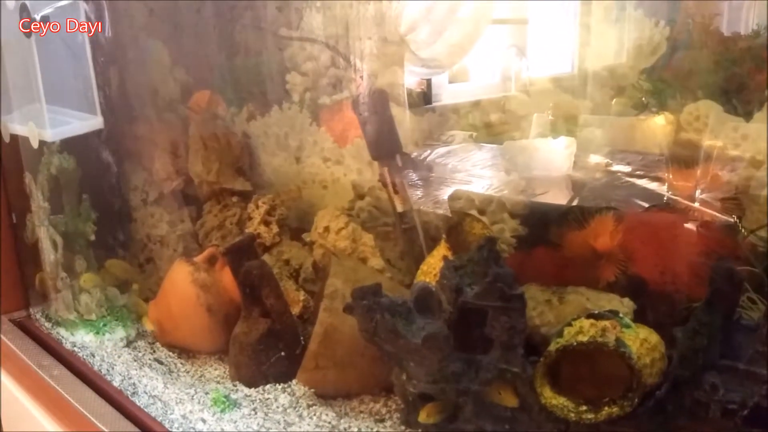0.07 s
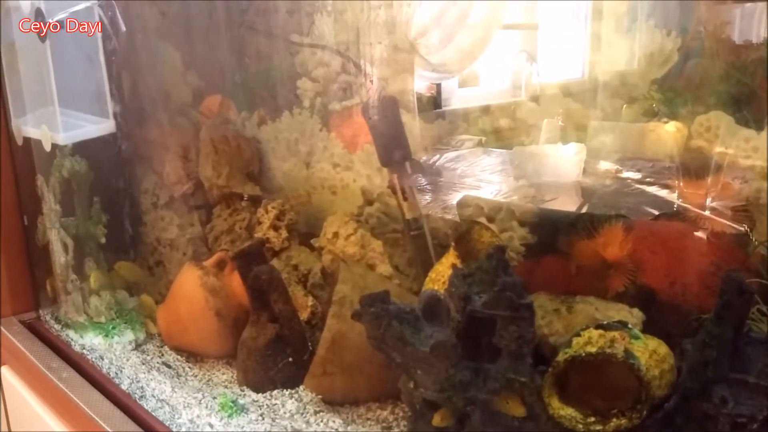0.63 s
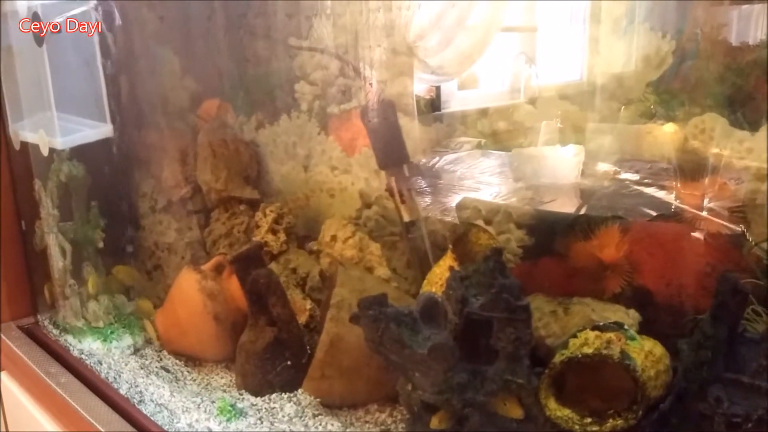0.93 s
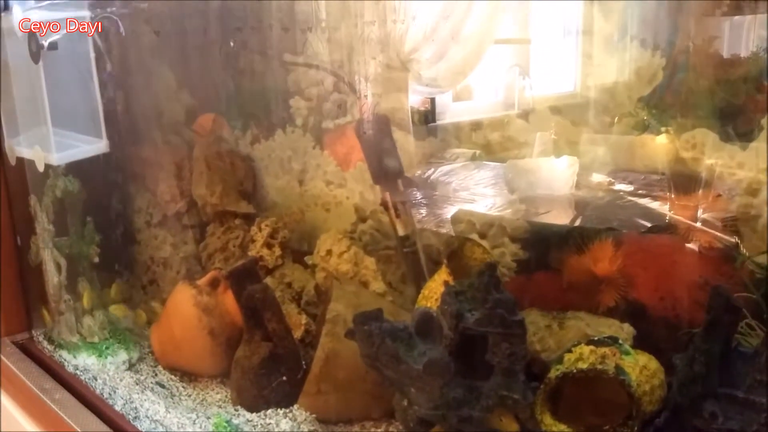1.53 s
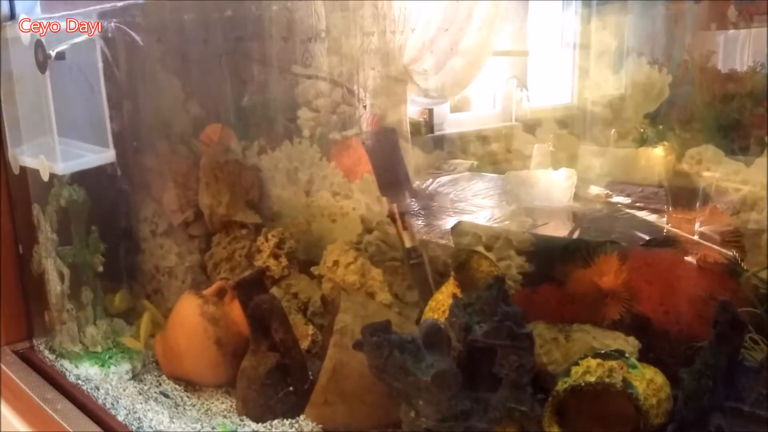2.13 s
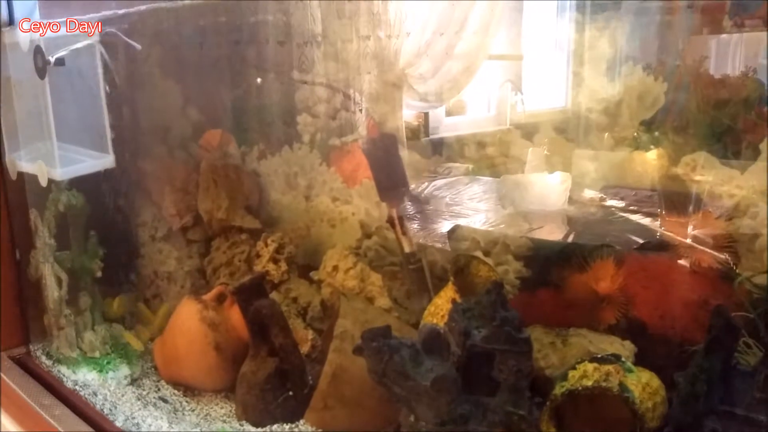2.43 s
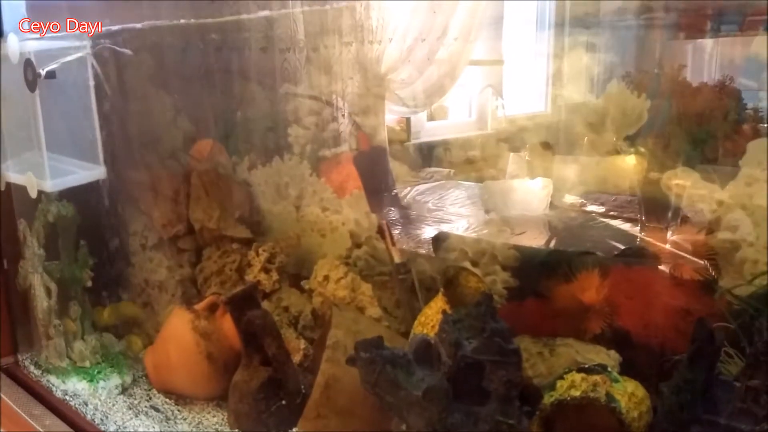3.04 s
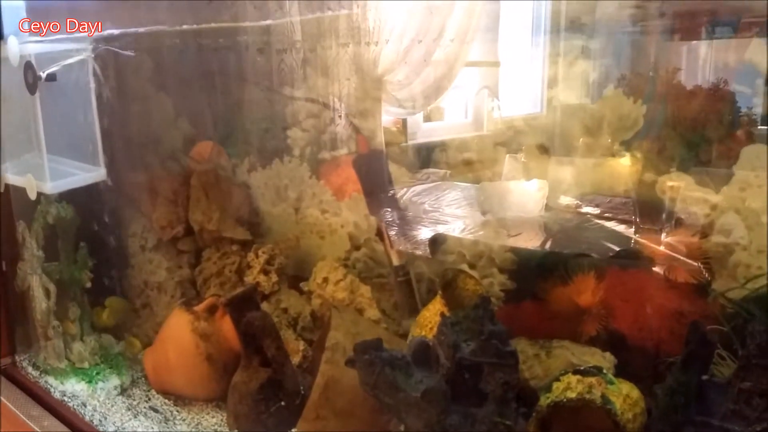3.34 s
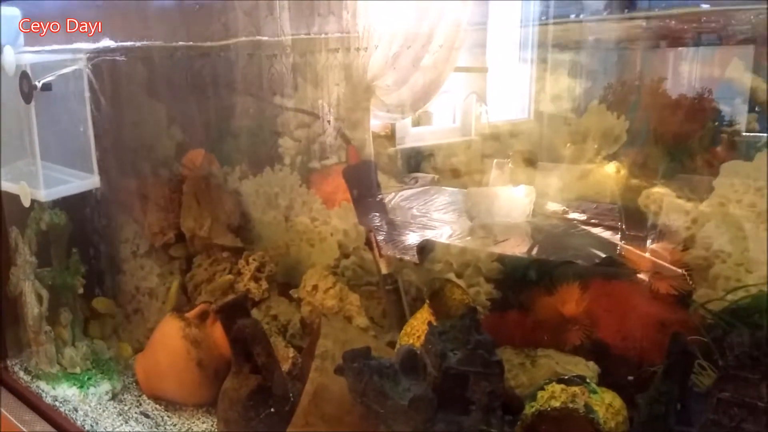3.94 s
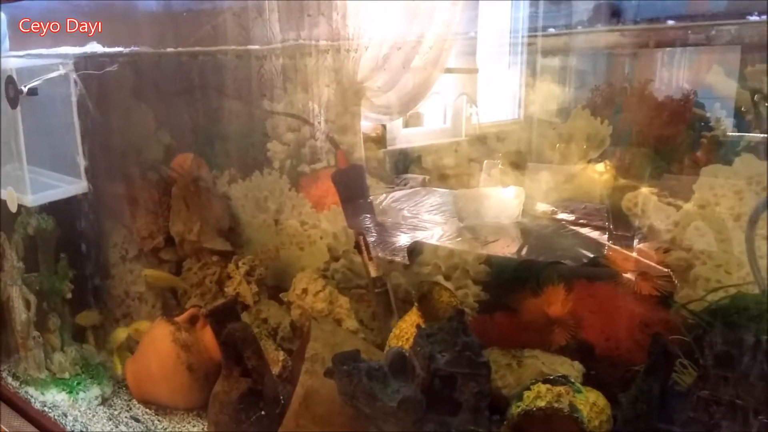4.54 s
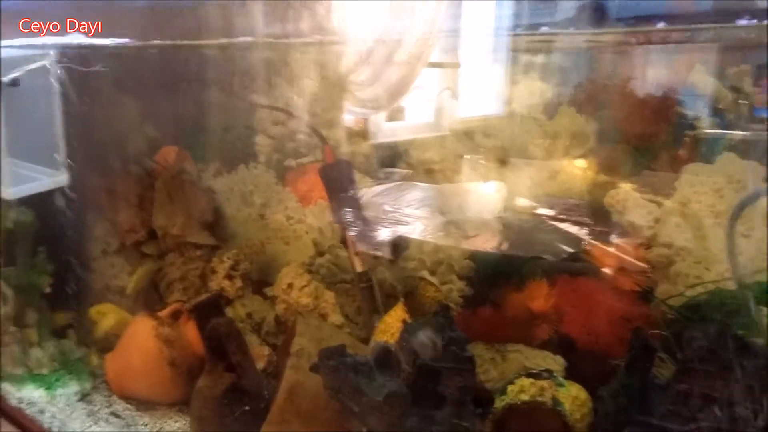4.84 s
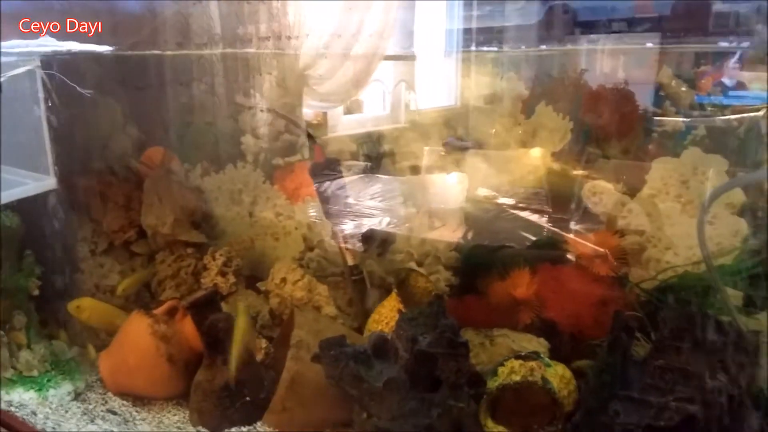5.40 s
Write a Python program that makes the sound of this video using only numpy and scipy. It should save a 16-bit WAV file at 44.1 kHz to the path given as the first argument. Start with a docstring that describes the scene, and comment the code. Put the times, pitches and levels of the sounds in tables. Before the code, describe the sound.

A quiet home aquarium is heard from just in front of the glass for about five and a half seconds. From start to finish a pump gives a steady low electric hum, throbbing gently as a second motor beats against it, with a soft rumble of churning water underneath. Over this the filter outflow trickles continuously onto the surface, with a fine, sputtering fizz toward the right. Small bubbles plink at irregular moments, many each second, high and varied in pitch, with a very short echo under the lid. At about 1.9 seconds a large air pocket gives a soft low gulp with a brief slosh. Two bubbles burst with faint, crisp ticks at about 3.4 and 4.3 seconds. A deeper gulp comes at about 4.9 seconds. The hum and trickle carry on at the same level to the end.

```python
"""A home aquarium, heard from just in front of the glass. Churning water rumbles, a mains-driven pump hums
at 50 Hz, and a second motor slips a little behind it, so the two beat and the hum throbs. Now and then a
large air pocket gives a soft low gulp, and two bubbles burst with a tick. The filter outflow trickles
onto the surface and entrains air: fine spray fizzes on the right, and bubbles ring as damped
oscillators, reverberating under the hood."""
import sys
import numpy as np
from scipy import signal
from scipy.fft import rfft, irfft
from scipy.io import wavfile
from scipy.ndimage import uniform_filter1d

SR = 44100
rng = np.random.default_rng(int(sys.argv[2]) if len(sys.argv) > 2 else 0)


def unload_audio(sound):
    """Save the sound as a 16-bit wav file, at the path given as the first command line argument."""
    columns = np.transpose(np.atleast_2d(sound))
    # keep every value between -1 and 1, then stretch to whole-number steps
    steps = np.round(np.clip(columns, -1, 1) * 32767)
    wavfile.write(sys.argv[1], SR, steps.astype(np.int16))


N = 245637
TIME = np.arange(N) / SR


def undb(db):
    """Decibels to amplitude ratio."""
    return 10 ** (np.asarray(db) / 20)


def unit(x):
    """Normalisation to rms 1."""
    return x / np.sqrt(np.mean(x ** 2))


def colour(x, points):
    """Spectral shaping by a curve through (frequency_hz, gain_db) points."""
    hz, db = np.transpose(points)
    bins = np.maximum(np.fft.rfftfreq(N, 1 / SR), 1)
    return irfft(rfft(x) * undb(np.interp(np.log(bins), np.log(hz), db)), N)


def walk(rate_hz):
    """Random modulation: smoothed Gaussian steps with rms 1."""
    hold = int(SR / rate_hz)
    steps = np.repeat(rng.standard_normal(N // hold + 1), hold)
    return unit(uniform_filter1d(uniform_filter1d(steps, hold), hold)[:N])


def add(out, start_s, sound):
    """Superposition of a sound at a given time."""
    i = int(np.clip(start_s * SR, 0, N - 1))
    out[i:i + len(sound)] += sound[:N - i]


# Spectrum of the churning water: frequency_hz, gain_db
CHURN_SPECTRUM = [(25, -11), (55, -10), (85, -4), (110, 3.5), (140, -3), (200, 8), (330, 2.5), (465, 5.5),
                  (520, 3), (620, 0.7), (900, -5), (1100, -1.4), (1170, -7), (1260, -1), (1400, -10.5),
                  (1550, -5.5), (1650, -6), (14000, -29)]
def churn():
    """Flow noise: water driven through the filter rumbles, its bass coherent between the two sides."""
    mid = rng.standard_normal(N)
    side = colour(rng.standard_normal(N), [(60, -3), (150, -22), (400, -.5), (800, -4.5), (1300, 1)])
    water = colour(np.array([mid + side, mid - side]), CHURN_SPECTRUM)
    return unit(water) * undb(-58 + .79 * walk(9.1))


# Resonances of the glass panes: centre_hz, width_hz
PANE_MODES = [(99, 8), (302, 8), (357, 41), (452, 8), (715, 70)]
def hum(turn_hz, delay_s, harmonics, spread_rad, waver_db):
    """Forced vibration: one stroke per turn gives a harmonic series, shifted in phase by the panes."""
    out = np.zeros((2, N))
    drift = (TIME / TIME[-1]) ** 2  # the listener moves ever faster through the room's standing waves
    for harmonic, *db in harmonics:
        hz = harmonic * turn_hz
        pane_lag = sum(2 * np.arctan2(hz * width, centre ** 2 - hz ** 2) for centre, width in PANE_MODES)
        # the shorter the wave, the more the two sides differ; the shortest lose step with the stroke
        side_lag = spread_rad * min(hz / 1000, 1) * rng.choice([-1, 1]) * np.array([[1], [-1]])
        lag = pane_lag + side_lag + (hz > 720) * rng.uniform(0, 2 * np.pi)
        level_db = db[0] + (db[-1] - db[0]) * drift + waver_db * min(hz / 600, 1) * walk(6.3)
        out += np.sqrt(2) * undb(level_db) * np.cos(2 * np.pi * hz * (TIME - delay_s) - lag)
    return out


# Partials of the pump at the drifting listener: harmonic_number, first_level_db, last_level_db
PUMP_HARMONICS = [(1, -84.7, -85.9), (2, -61.7, -62.3), (3, -57.5, -57.8), (4, -52.2, -53.7),
                  (5, -61.2, -62.8), (6, -65.2, -64.6), (7, -60.0, -61.3), (8, -69.3, -69.2),
                  (9, -68.5, -76), (10, -70.5, -62.5), (11, -66.5, -65.4), (12, -66, -67),
                  (13, -72.2, -74.1), (14, -73.1, -73.0), (15, -85.7, -84.3), (16, -88.6, -81.9),
                  (17, -81.7, -78.5), (18, -85.6, -87.7), (19, -78.7, -77.7), (20, -77.0, -81.2),
                  (21, -78.0, -81.0), (22, -70, -76.5), (23, -83, -86), (24, -77.5, -77.9),
                  (25, -75.5, -82), (26, -78.0, -75.2), (27, -80.7, -77.7), (28, -79.2, -77.9),
                  (29, -82.1, -76.5), (30, -72.3, -70.5)]
# Partials of the slower motor: harmonic_number, level_db
MOTOR_HARMONICS = [(1, -96.6), (2, -87.1), (3, -73.0), (4, -65.9), (5, -65.7), (6, -75.5), (7, -77.7),
                   (8, -72.7), (9, -71.7), (10, -86.7), (11, -80.6), (12, -83.6)]
def pumps():
    """Beats: the pump pulls on the glass once per mains cycle, and the motor runs slightly slower."""
    pump = hum(turn_hz=50, delay_s=0, harmonics=PUMP_HARMONICS, spread_rad=.5, waver_db=.25)
    motor = hum(turn_hz=48.848, delay_s=.0067, harmonics=MOTOR_HARMONICS, spread_rad=.8, waver_db=1)
    return pump + motor


def bubble(hz, decay_s, glide, rise):
    """Damped oscillation: a pocket of air rings and shifts in pitch as it nears the surface."""
    age = np.arange(int(6 * decay_s * SR) + 2) / (decay_s * SR)  # age and rise are in decay times
    pitch_hz = np.minimum(hz * 2 ** (glide * np.minimum(age, 2)), SR / 2)
    return np.sin(2 * np.pi * np.cumsum(pitch_hz) / SR) * np.exp(-age) * (1 - np.exp(-age / rise))


# Large air pockets: start_s, pitch_hz, gain_db, decay_s, glide_octaves_per_decay, slosh_db
AIR_POCKETS = [(1.944, 259, -39.5, 0.03, -0.014, -54.5), (4.899, 157, -36.5, 0.027, -0.24, -84),
               (4.926, 110, -35.5, 0.035, 0.033, -78), (4.925, 315, -48, 0.018, -0.059, -65)]
def gulps():
    """Bubble resonance falls with size: a large pocket breaks loose with a low note and a brief slosh."""
    notes, swell = np.zeros(N), np.zeros(N)
    for start_s, hz, gain_db, decay_s, glide, slosh_db in AIR_POCKETS:
        add(notes, start_s, undb(gain_db) * bubble(hz, decay_s, glide, rise=.99))
        swell += undb(slosh_db) * np.exp(-((TIME - start_s - .02) / .066) ** 2)
    notes = colour(notes, [(50, -20), (100, -2)])  # the tank is too small to radiate the deepest bass
    slosh_spectrum = [(120, -28), (280, 11), (600, 2), (1500, 3.5), (2200, -19), (12000, -60)]
    slosh = colour(rng.standard_normal((2, N)), slosh_spectrum)
    return notes + swell * unit(slosh)


def reflections(t60_s, direct):
    """Reverberation: echoes between water, glass and lid decay exponentially, different on each side."""
    t = TIME[:SR // 6]
    echoes = rng.standard_normal((2, len(t))) * np.exp(-np.log(1000) * t / t60_s)
    echoes /= np.linalg.norm(echoes, axis=1, keepdims=True)
    echoes[:, 0] += direct
    return echoes / np.hypot(1, direct)


def hood(x, t60_s, direct, paths):
    """Time-varying reverberation: the surface ripples, so the echo paths under the lid keep changing."""
    shares = np.array([walk(14) for _ in range(paths)])
    shares /= np.linalg.norm(shares, axis=0)
    return sum(signal.oaconvolve((share * x)[None], reflections(t60_s, direct), axes=1)[:, :N]
               for share in shares)


# Bubbles bursting at the surface: start_s, level_db
BURSTS = [(3.373, -44.5), (4.276, -45.5)]
# Spectrum of a tearing film: frequency_hz, gain_db
BURST_SPECTRUM = [(600, -28), (1400, -8), (2000, -4), (2600, 5), (4200, 1), (5200, -6), (9000, -43),
                  (14000, -70)]
def pops(decay_s=.0066):
    """Impulsive excitation: the film of a bubble tears, and the short crack echoes under the lid."""
    crack = unit(colour(rng.standard_normal(N), BURST_SPECTRUM))
    envelope = np.zeros(N)
    for start_s, level_db in BURSTS:
        add(envelope, start_s, undb(level_db) * np.exp(-TIME[:SR // 10] / decay_s))
    return signal.oaconvolve((crack * envelope)[None], reflections(t60_s=.19, direct=.17), axes=1)[:, :N]


def swarm(count, low_hz, high_hz, cycles, spread_db):
    """Incoherent sum: many small bubbles ring at random moments, a few much louder than the rest."""
    out = np.zeros(N)
    for when, size, rank, length in rng.random((count, 4)):
        hz = low_hz * (high_hz / low_hz) ** size
        gain = undb(-spread_db * np.log(np.maximum(rank, .02)))
        decay_s = cycles * (.5 + length) / hz
        add(out, when * N / SR, gain * bubble(hz, decay_s, glide=.04, rise=.15))
    return out


# Spectrum of the spray and its drops: frequency_hz, gain_db
SPRAY_SPECTRUM = [(3500, 0.5), (5200, -4), (6500, 0.5), (7500, 0), (9000, -5), (10500, -10.5), (12000, -19),
                  (15000, -60)]
# Strength of the spray: time_s, relative_level_db
SPRAY_ENVELOPE = [(0.0, -70.5), (0.34, -70.5), (0.43, -75), (0.55, -67.5), (1.55, -72), (1.92, -69.5),
                  (2.05, -76), (2.27, -67), (2.45, -74), (2.55, -70.5), (2.79, -76.5), (3.02, -71.5),
                  (3.13, -77), (3.45, -77), (3.54, -71), (3.78, -75), (3.88, -69), (4.22, -75.5),
                  (4.33, -68), (4.42, -71.5), (5.03, -73.5), (5.18, -69.5), (5.57, -78)]
def spray(drops_per_s=50, scatter_db=10):
    """Resonance and impact: the tiniest bubbles fizz and falling drops tick. Returns fizz and drops."""
    sputter_db = 1.54 * walk(20)
    level_db = np.interp(TIME, *np.transpose(SPRAY_ENVELOPE)) + 9.5 + sputter_db
    bubbles = swarm(count=6000, low_hz=4500, high_hz=13000, cycles=2.5, spread_db=3)
    fizz = unit(colour(bubbles, SPRAY_SPECTRUM)) * undb(level_db)
    count = int(drops_per_s * N / SR)
    late, loud = rng.random((count, 2)).T
    landings = ((np.arange(count) + late) * (N - 1) / count).astype(int)
    ticks = np.zeros(N)
    ticks[landings] = undb(scatter_db * loud)
    drops = unit(colour(ticks, SPRAY_SPECTRUM)) * undb(level_db - 3.5)
    return fizz, drops


# Spectrum of the trickle: frequency_hz, gain_db
TRICKLE_SPECTRUM = [(1400, -22), (2160, -28), (2290, -4), (2700, -6), (3300, -2), (4200, -3.5), (5200, 2.5),
                    (6500, -1), (8000, -22), (14000, -52)]
# Strength of the trickle: time_s, level_db
TRICKLE_ENVELOPE = [(0.0, -62.3), (0.6, -61), (1.2, -62), (1.5, -59.9), (1.8, -60.8), (2.3, -60.2),
                    (2.8, -60.6), (3.2, -61.2), (3.9, -60.8), (4.7, -61.9), (5.57, -61.2)]
def trickle():
    """Air entrainment: the sputtering jet drags under a stream of small ringing bubbles."""
    sputter_db = 1.34 * walk(20)
    level_db = np.interp(TIME, *np.transpose(TRICKLE_ENVELOPE)) + sputter_db
    bubbles = swarm(count=4200, low_hz=1900, high_hz=8000, cycles=5, spread_db=2.2)
    return unit(colour(bubbles, TRICKLE_SPECTRUM)) * undb(level_db)


# Screening of the left side from the outflow: frequency_hz, gain_db
LEFT_SHADOW = [(1500, -7), (2300, 4.5), (3200, 1.5), (4200, -1), (4800, 0.5), (5300, -5), (6200, -9.5),
               (7500, -21), (9000, -16), (12000, -4)]
def outflow():
    """Acoustic shadow: trickle and spray echo under the hood, and lose their high treble on the left."""
    fizz, drops = spray()
    impacts = hood(drops, t60_s=.05, direct=.14, paths=4)
    bubbling = hood(trickle() + fizz, t60_s=.083, direct=.32, paths=8)
    left, right = impacts + bubbling
    return np.array([colour(left, LEFT_SHADOW), right])


def plink(hz, lead_s, fragment_db=-4, side_phase_rad=1.3):
    """Free oscillation: a bubble and two fragments split from it swell, slide up in pitch and decay."""
    t = TIME[:SR // 12] - lead_s
    decay_s = .0038 * (2500 / hz) ** .5  # high notes are briefer
    ring = np.zeros((2, len(t)))
    for fragment in (0, 1, -1):  # the parent, a sharper fragment, a flatter one
        late, detune, glide = rng.random(3)
        age = t / decay_s - abs(fragment) * late * 1.8
        envelope = 1 / (np.exp(-age / .6) + np.exp(age))
        envelope /= envelope.max()
        octaves = fragment * (.5 + detune) * .07 + .06 * glide * np.clip(age, -2, 2)
        phase = 2 * np.pi * np.cumsum(hz * 2 ** octaves) / SR
        side_lag = np.array([[1], [-1]]) * rng.choice([-.5, .5]) * side_phase_rad
        ring += undb(abs(fragment) * fragment_db) * envelope * np.sin(phase + side_lag)
    return ring * np.linalg.norm(envelope) / np.linalg.norm(ring)


# Bubbles that stand out: peak_s, pitch_hz, relative_level_db, relative_echo_db, left_minus_right_db
RINGING_BUBBLES = [(0.161, 1510, -56.5, -5, -3), (0.21, 2330, -54, 0, 0), (0.398, 3220, -50.5, -5, -4),
                   (0.446, 5180, -51.5, -4, -3), (0.522, 5100, -52.5, -4, -6), (0.525, 1570, -53.5, -8, -5),
                   (0.571, 5330, -50, -13, -7), (0.582, 3220, -58, -10, -6), (0.646, 1560, -52.5, -8, -6),
                   (0.682, 3880, -54.5, 2, -3), (0.782, 7260, -54, -12, -19), (0.826, 2890, -52.5, -2, -1),
                   (0.944, 2510, -52.5, -5, 1), (0.952, 5150, -51.5, -11, -3), (1.005, 4900, -54, -6, -3),
                   (1.024, 2660, -50.5, -9, 6), (1.111, 5090, -51.5, -10, -3), (1.159, 7150, -55, -3, -14),
                   (1.184, 2440, -51.5, -2, 6), (1.321, 2490, -57, -5, 4), (1.338, 4470, -54.5, -13, -2),
                   (1.39, 4190, -60, -4, -1), (1.422, 4870, -52, 0, -5), (1.494, 2500, -52.5, -2, -1),
                   (1.722, 2290, -57, 0, -1), (1.865, 2990, -56, 1, 1), (1.872, 5400, -53, -1, -10),
                   (1.916, 7500, -55, -4, -20), (1.927, 3120, -53.5, -4, 0), (1.944, 2280, -49.5, -3, 3),
                   (2.007, 5260, -52, -3, -7), (2.224, 6400, -57, 4, -13), (2.266, 7910, -54, -3, -19),
                   (2.276, 5250, -48, -5, -4), (2.293, 3440, -55.0, -7, -1), (2.527, 2470, -55, -8, 5),
                   (2.539, 5020, -46.5, -4, -4), (2.788, 2570, -48.5, -7, 3), (2.811, 1476, -51, -7, 0),
                   (2.936, 2420, -47, -3.5, 4), (2.969, 2970, -60, -3, 0), (3.304, 5780, -53.5, -8, -10),
                   (3.337, 2365, -55, 3, 2), (3.389, 2300, -51.5, 0, 3), (3.443, 2860, -58, -5, -2),
                   (3.552, 4980, -48.5, -2, -8), (3.695, 1970, -57, 0, 0), (3.695, 2850, -57, -4, 2),
                   (3.754, 2850, -54, -6, 4), (3.766, 2300, -50.5, 3.5, 3), (3.853, 3760, -56, 3, -1),
                   (3.991, 3390, -55.5, -4, -3), (4.0, 1870, -56.5, -2, 4), (4.021, 2840, -56.5, 0, 2),
                   (4.035, 6220, -56.5, -5, -17), (4.054, 2860, -54, -9, 2), (4.119, 1880, -53.5, 0.5, 8),
                   (4.223, 2530, -55, -5, 9), (4.273, 1524, -48, -3, -1), (4.285, 2560, -52.5, -4, 3),
                   (4.332, 7150, -56, -1, -20), (4.333, 3180, -55, -9, 3), (4.395, 3210, -52, 0, 2),
                   (4.441, 2580, -51.5, 0, -3), (4.469, 2310, -57.0, 0, 5), (4.562, 2770, -55.5, -1, 2),
                   (4.611, 3190, -53.5, -6, 4), (4.638, 2300, -55.5, 0, 7), (4.75, 3690, -52.5, -2, 2),
                   (4.831, 2300, -50, 0, 1), (4.898, 6270, -52.5, -10, -12), (4.913, 1986, -58.0, 3, 9),
                   (4.953, 5680, -52.5, -4, -13), (5.032, 3100, -53, -6, 0), (5.155, 7760, -52.5, -6, -20),
                   (5.223, 5280, -50.5, -4, -9), (5.296, 3700, -54, -4, 3), (5.5, 4350, -51, -2, -6),
                   (5.547, 2330, -50.5, -4, 0)]
def plinks(hood_hz=2320, hood_width_hz=150, lead_s=.025, echo_delay_s=.004):
    """Cavity resonance: bubbles ring across the tank; those in tune with the hood's air echo longer."""
    out = np.zeros((2, N))
    for peak_s, hz, level_db, echo_db, pan_db in RINGING_BUBBLES:
        ring = plink(hz, lead_s)
        linger = 1 + .45 * np.exp(-((hz - hood_hz) / hood_width_hz) ** 2)
        echo = signal.fftconvolve(ring, reflections(t60_s=.17 * linger, direct=0), axes=1)
        echo *= undb(echo_db + 1.2) * np.linalg.norm(ring) / np.linalg.norm(echo)
        pan = unit(undb(np.array([[1], [-1]]) * pan_db / 2))
        gains = undb(level_db + 1.1) * pan
        for side, direct, reflected in zip(out, gains * ring, gains * echo):
            add(side, peak_s - lead_s, direct)
            add(side, peak_s - lead_s + echo_delay_s, reflected)
    return out


def scene():
    """Superposition: hum, churning water, outflow, ringing bubbles, pops and gulps add linearly."""
    return pumps() + churn() + outflow() + plinks() + pops() + gulps()


def record(dry, hiss_db=-88, cutoff_hz=15700):
    """Noise floor and bandwidth: the microphones add a faint hiss, and a steep low-pass cuts the top."""
    hiss = undb(hiss_db) * rng.standard_normal((2, N))
    return signal.sosfilt(signal.ellip(10, .1, 70, cutoff_hz, fs=SR, output="sos"), dry + hiss)


dry = scene()
out = record(dry)
unload_audio(out)
```